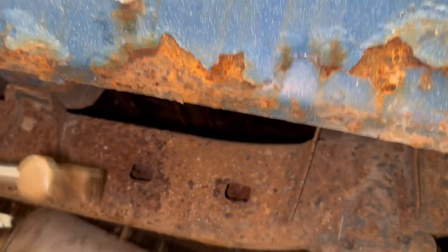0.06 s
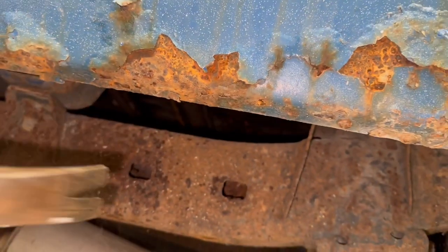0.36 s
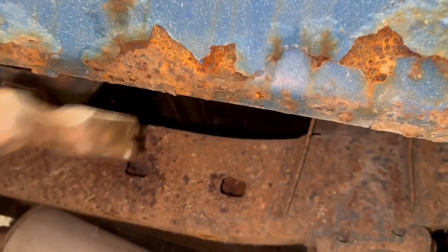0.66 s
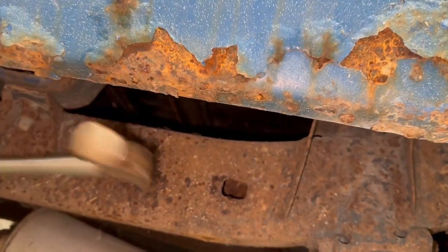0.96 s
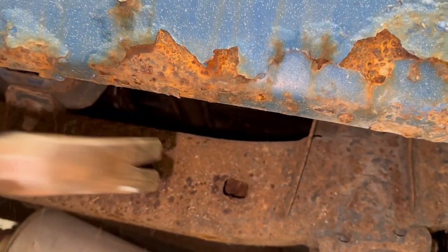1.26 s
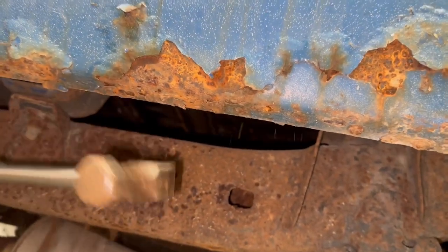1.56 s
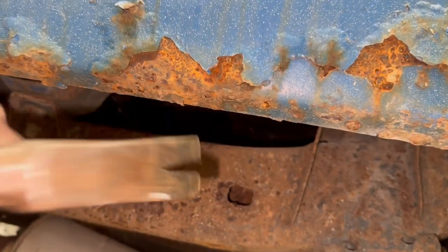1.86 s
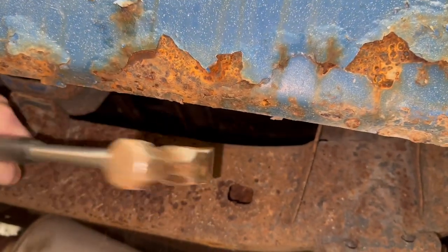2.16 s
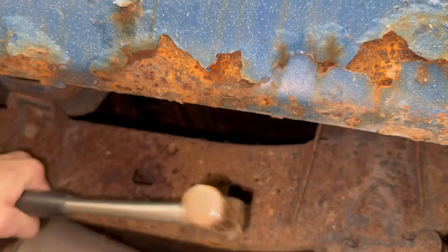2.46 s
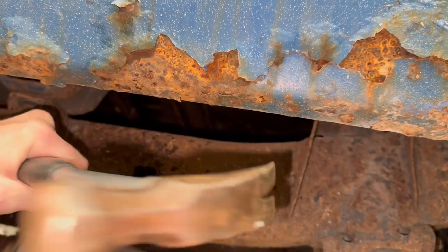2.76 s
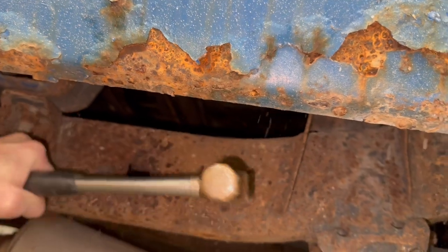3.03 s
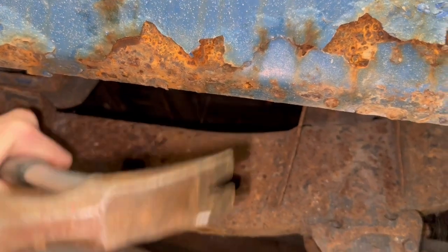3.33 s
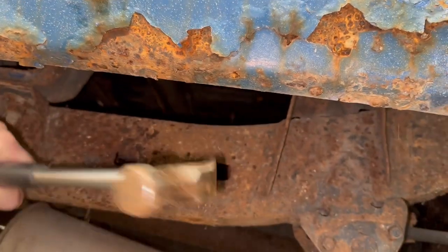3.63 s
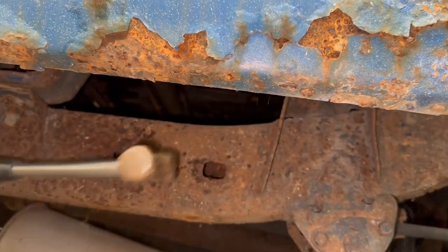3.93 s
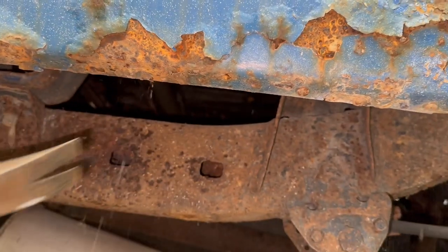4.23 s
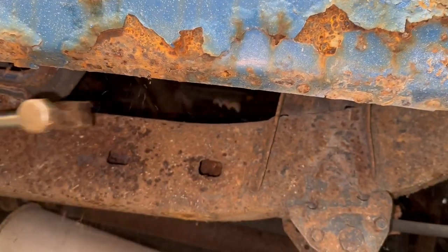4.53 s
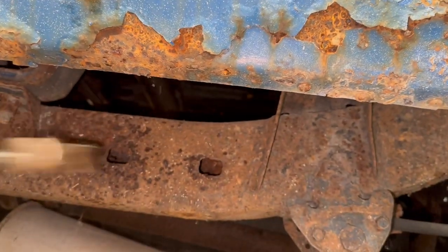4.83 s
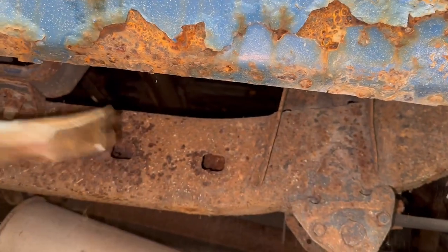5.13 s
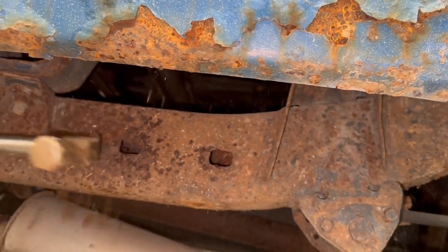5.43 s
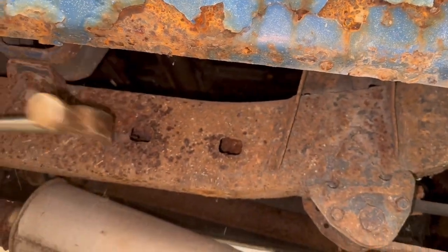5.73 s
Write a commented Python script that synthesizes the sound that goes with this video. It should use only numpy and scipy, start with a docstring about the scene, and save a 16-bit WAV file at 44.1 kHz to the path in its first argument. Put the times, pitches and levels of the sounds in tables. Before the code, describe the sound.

Close, steady hammer blows clank on a corroded steel chassis outdoors, with a short hollow boom and faint trickles of rust.

```python
"""Outdoors, close to the microphone, a claw hammer strikes a vehicle's rusty steel frame rail twice a second.
We come in just after a blow, over faint air. Each blow cracks on the rust, clanks the wall of the rail
and sets the chassis booming and a panel humming; a moment later the loosened rust lands.
The hammer works along the rail and back, catches the folded edge at 4.4 s, and bounces after each of
the last three blows. Throughout, the recorder's limiter holds the peaks."""
import sys
import numpy as np
from scipy import signal
from scipy.fft import rfft, irfft
from scipy.io import wavfile
from scipy.ndimage import uniform_filter1d, minimum_filter1d

SR = 44100
rng = np.random.default_rng(int(sys.argv[2]) if len(sys.argv) > 2 else 0)


def generate_wav(signal):
    """Clip the signal to [-1, 1] and save it as 16-bit WAV at the path in sys.argv[1]."""
    frames = np.transpose(np.atleast_2d(signal))
    scaled = np.clip(frames, -1, 1) * 32767
    pcm = np.round(scaled).astype(np.int16)
    wavfile.write(sys.argv[1], SR, pcm)


N = 259749
RING_T = np.arange(SR) / SR  # the one second in which a struck sound is built
RING_HZ = np.fft.rfftfreq(SR, 1 / SR)


def amp(db):
    """Decibels to gain."""
    return 10 ** (np.asarray(db) / 20)


def unit(x):
    """Scales to an rms of 1."""
    return x / np.sqrt(np.mean(x ** 2) + 1e-20)


def curve(points, hz):
    """Joins (frequency, value) points on a log-frequency axis."""
    f, value = np.transpose(points)
    return np.interp(np.log(hz + 1), np.log(f + 1), value)


def colour(x, spectrum):
    """Filters by (frequency [Hz], gain [dB]) points."""
    return irfft(rfft(x) * amp(curve(spectrum, np.fft.rfftfreq(len(x), 1 / SR))), len(x))


def noise(spectrum, size):
    """Coloured noise of rms 1."""
    return unit(colour(rng.standard_normal(size), spectrum))


def add(mix, s, sound):
    """Mixes in a sound that starts at time s, possibly before zero."""
    start = round(s * SR)
    sound = sound[max(-start, 0):]
    part = mix[max(start, 0):][:len(sound)]
    part += sound[:len(part)]


# Open air around the microphone: (frequency [Hz], relative level [dB])
AIR_SPECTRUM = [(20, -19), (55, -36), (120, 6), (300, 2.5), (1000, 0), (3000, -15.5), (8000, -25),
                (16000, -26)]
def air(level_db=-52):
    """Faint, steady outdoor noise, mostly low."""
    return amp(level_db) * noise(AIR_SPECTRUM, N)


# Level of the ring lingering after each blow, loudest at the start: (time [s], level [dB])
LINGER_LEVEL = [(0, 16), (0.5, 8), (2, 4), (4.85, -2), (5.3, -13)]
def panel(hz=116, width_hz=4, level_db=-39, t60=2.7, linger_share=0.66, swell_s=0.18):
    """A loose body panel takes up every blow and hums on through the gaps as close partials that beat."""
    t = np.arange(N) / SR
    partials = sum(np.cos(2 * np.pi * ((hz + k * width_hz) * t + rng.random())) / (1 + 2 * k ** 2)
                   for k in (-1, 0, 1))
    power = np.zeros(N)
    for s, db, *_ in HAMMER_BLOWS:
        hum_db = db + linger_share * np.interp(s, *np.transpose(LINGER_LEVEL))
        add(power, s, (amp(hum_db - 60 * t / t60) * np.minimum(t / swell_s, 1)) ** 2)
    return amp(level_db) * unit(partials) * np.sqrt(power)


def grains(per_s, spread_db):
    """A second of random ticks of very unequal size."""
    sizes = amp(spread_db * np.minimum(rng.exponential(1, SR), 4)) * rng.choice([-1, 1], SR)
    return sizes * (rng.random(SR) < per_s / SR)


def uneven(x, spread_db=5, count=26):
    """Chance peaks and dips in the treble: no two bits of rust are the same size."""
    pitches = np.geomspace(1500, 16000, count)
    return colour(x, np.c_[pitches, spread_db * rng.uniform(-1, 1, count)])


def flake(length_s, first_tick_db=15):
    """One flake lands with a tick, then its crumbs thin out."""
    ticks = unit(grains(per_s=350, spread_db=6)) * np.exp(-(RING_T / length_s) ** 2)
    ticks[0] = amp(first_tick_db)
    return uneven(ticks)[:SR // 2]


# Large flakes landing on their own: (time [s], level [dB], length [s])
LARGE_FLAKES = [(0.169, -42, 0.023), (0.7, -40, 0.017), (1.362, -52.5, 0.044), (1.746, -36.5, 0.015),
                (3.038, -36, 0.0097), (3.2324, -33, 0.0068), (3.735, -46.5, 0.025), (4.078, -35.5, 0.01),
                (4.645, -44.5, 0.0034)]
# Tone of rust landing under the vehicle: (frequency [Hz], gain [dB])
FLAKE_TONE = [(1000, -7), (3000, -10), (5500, -3.5), (8000, -6), (11000, 3), (14000, -4), (16000, -4)]
def falling_rust(fall_s=0.3, fall_spread=0.4, shower_db=-1, size_db=3, straggler_db=-14,
                 scatter_db=-7, scatter_t60=0.12, count=7):
    """Each blow sheds small flakes, a few large ones fall too; the underbody scatters their sound."""
    out = np.zeros(N)
    for s, *_, rust_db in HAMMER_BLOWS:
        lateness = 2 * (np.arange(count) + rng.random(count)) / count - 1
        for late, size in zip(lateness, rng.uniform(-1.1, 1, count)):
            db = rust_db + shower_db + size_db * size + straggler_db * late ** 2  # faint first and last
            add(out, s + fall_s * np.exp(fall_spread * late), amp(db) * flake(length_s=0.06))
    for s, db, length_s in LARGE_FLAKES:
        add(out, s, amp(db) * flake(length_s))
    out = colour(out, FLAKE_TONE)
    scatter = rng.standard_normal(SR) * amp(-60 * RING_T / scatter_t60)
    return out + amp(scatter_db) * signal.fftconvolve(out, scatter / np.linalg.norm(scatter))[:N]


def mode_crowd(spectrum, t60s, rise_cycles, count=12):
    """Countless weak modes as noise dying band by band, the bass swelling last: two shapes, as spectra."""
    shapes = np.array([rfft(noise(spectrum, SR)) for _ in range(2)])
    centres = np.geomspace(50, 15000, count)
    out = 0
    for hz, weights in zip(centres, np.eye(count)):
        band = irfft(shapes * curve(np.c_[centres, weights], RING_HZ))
        out = out + band * amp(-60 * RING_T / curve(t60s, hz)) * (1 - np.exp(-RING_T * hz / rise_cycles))
    return rfft(out)


def struck_at(shapes, place_m, wavelength_at_1khz_m=0.62):
    """The mix of two shapes turns along the rail, faster for the short bending waves of the treble."""
    turn = 2 * np.pi * place_m / wavelength_at_1khz_m * np.sqrt(RING_HZ / 1000)
    return irfft(shapes[0] * np.cos(turn) + shapes[1] * np.sin(turn))


# The lingering ring: (frequency [Hz], relative level [dB]) and (frequency [Hz], t60 [s])
LINGER_SPECTRUM = [(25, -68), (40, -20.5), (56, -19), (85, -10), (125, -2), (280, -2), (350, -7.5),
                   (560, -6), (900, -8.5), (1400, -16.5), (2000, -26), (4300, -38.5), (5900, -40),
                   (16000, -49)]
LINGER_DECAY = [(70, 1.63), (200, 1.04), (600, 1.1), (1500, 1.03), (5000, 0.78), (12000, 0.38)]
def lingering_ring(level_db=-22):
    """Weak, slowly dying modes ring on after a blow: two shapes, as spectra."""
    return amp(level_db) * mode_crowd(LINGER_SPECTRUM, LINGER_DECAY, rise_cycles=0.14)


# Chassis: (frequency [Hz], relative level [dB]) and (frequency [Hz], t60 [s])
BOOM_SPECTRUM = [(40, -23.5), (110, 9.5), (250, -2.5), (550, 3.5), (720, -6), (1300, -9), (1900, -13.5),
                 (3000, -17), (4500, -26.5), (5900, -25.5), (7500, -36.5), (11000, -27), (16000, -90)]
BOOM_DECAY = [(100, 0.79), (500, 0.57), (1300, 0.2), (4000, 0.13), (14000, 0.12)]
def chassis_boom(level_db=-16):
    """The chassis's weaker modes boom together and die quickly: two shapes, as spectra."""
    return amp(level_db) * mode_crowd(BOOM_SPECTRUM, BOOM_DECAY, rise_cycles=2.13)


# Tone of the echo along the rail: (frequency [Hz], gain [dB])
ECHO_TONE = [(100, -24), (250, -4), (600, 9), (1000, -24), (2500, -14)]
def rail_echo(boom, place_m, level_db=-13):
    """Low waves return from the far end of the rail."""
    return amp(level_db) * colour(struck_at(boom, -place_m), ECHO_TONE)


# Modes of the frame, and of the rail wall under the hammer: (frequency [Hz], level [dB], t60 [s])
FRAME_MODES = [(88, -32, 0.35), (116, -40, 0.67), (130.2, -20.5, 0.36), (167.9, -9.5, 0.11),
               (198.5, -26.5, 0.79), (221.3, -26.5, 0.77), (231.3, -55, 0.99), (272.3, -23.5, 0.73),
               (297.6, -19, 0.42), (386, -10.5, 0.077), (405.1, -21.5, 0.81), (434, -6, 0.065),
               (455.3, -29.5, 0.65), (478.7, -16.5, 0.19), (495.2, -12, 0.092), (604.6, -17.5, 0.26),
               (701, -71, 0.2), (700, -31, 0.23), (840, -27, 0.22), (876, -22.5, 0.28), (890, -37, 1.18),
               (1013, -13.5, 0.042), (1096, -27, 0.31), (1166, -25, 0.15), (1280, -94, 0.12),
               (1183, -32, 0.18), (1432, -31, 0.26), (1370, -64, 0.13)]
WALL_MODES = [(886, -14.5, 0.023), (1250, -1, 0.016), (1564, -11.5, 0.014), (2003, -16, 0.018),
              (2535, -21.5, 0.025), (5480, -38, .02), (6130, -29.5, 0.016), (11000, -50, 0.0067)]
def steel_ring(modes, rise_cycles):
    """One dying sine a row; neighbours start opposed, so the sound builds as waves cross the steel."""
    rows = []
    for k, (hz, db, t60) in enumerate(modes):
        envelope = amp(db - 60 * RING_T / t60) * (1 - np.exp(-RING_T * hz / rise_cycles))
        rows.append((-1) ** k * envelope * np.sin(2 * np.pi * hz * RING_T))
    return np.array(rows)


# Bright ring of the steel: (frequency [Hz], width [Hz], level [dB], t60 [s])
PING_CLUSTERS = [(1370, 190, -38.5, 0.54), (1780, 120, -50, 0.67), (1870, 140, -51, 0.52),
                 (2460, 120, -52, 0.52), (3530, 220, -47.5, 0.21), (4350, 150, -66, 0.69),
                 (5600, 350, -55.5, 0.77), (6170, 180, -54, 0.4)]
def steel_ping(rise_s=0.0005):
    """Clusters of close partials beat as they die: two shapes, as spectra."""
    shapes = rfft(rng.standard_normal((2, SR)))
    out = 0
    for hz, width_hz, db, t60 in PING_CLUSTERS:
        cluster = unit(irfft(shapes * np.exp(-((RING_HZ - hz) / width_hz) ** 2)))
        out = out + cluster * amp(db - 60 * RING_T / t60)
    return rfft(out * (1 - np.exp(-RING_T / rise_s)))


# Rust crushed under the face, heard close up: (frequency [Hz], relative level [dB])
CRACK_SPECTRUM = [(300, -16), (1200, 9), (2400, -3.5), (3400, -2.5), (4700, -4.5), (6100, 0.5),
                  (7800, -8.5), (13000, -6.5), (16000, -15)]
def rust_crack(level_db=-17, hold_s=0.0027, rise_s=0.0013, spray_db=-22, spray_t60=0.11):
    """A few milliseconds of grit as the face crushes the rust, then a thin spray of chips."""
    grit = unit(colour(grains(per_s=14000, spread_db=5.5), CRACK_SPECTRUM))
    chips = unit(colour(grains(per_s=4000, spread_db=3), CRACK_SPECTRUM))
    crush = grit * (1 - np.exp(-RING_T / rise_s)) / (1 + (RING_T / hold_s) ** 2)
    spray = chips * amp(spray_db - 60 * RING_T / spray_t60)
    return amp(level_db) * (uneven(crush) + spray)


# Bounces of the hammer head: (time [s], thud [dB], click [dB])
HEAD_BOUNCES = [(4.9398, -13.5, -1.5), (5.3958, -20.5, -16.5), (5.7844, -16, -10)]
def bounces(ping_db=-12, linger_db=0):
    """The head drops back on the rail where the last blow landed."""
    for s, thud_db, click_db in HEAD_BOUNCES:
        place_m = [blow[2] for blow in HAMMER_BLOWS if blow[0] < s][-1]
        yield s, place_m, [(1200, thud_db), (2200, click_db)], click_db + ping_db, linger_db


# Blows close to the microphone:
# (time [s], strength [dB], place along the rail [m], on the edge [0-1], ping [dB], loosened rust [dB])
HAMMER_BLOWS = [(-.06, -2.5, .03, 0.04, 3, -48), (0.4595, 0, 0.047, 0.12, 0.5, -50.5),
                (0.9652, 0.5, 0.036, 0.14, -1.5, -57.5), (1.4523, 0, 0.11, 0.06, 0, -48.5),
                (1.9647, -1, 0.12, 0, 5, -55.5), (2.4608, -0.5, 0.14, 0.06, 1.5, -55.5),
                (2.955, 0, 0.19, 0.17, -10, -69), (3.4377, -1, 0.15, 0.02, 0, -55.5),
                (3.884, 0, 0.16, 0.07, 1, -71), (4.4020, 0, 0.053, 1, 9, -71),
                (4.8569, 1, 0.082, 0.18, 2.5, -65), (5.2968, 0, 0.0032, 0.03, 3.5, -71),
                (5.7030, -0.5, 0.013, 0.08, 5, -53.5)]
# A blow on the folded edge loses its low knock and clanks brighter: (frequency [Hz], gain [dB])
EDGE_TONE = [(230, -2.5), (420, -13.5), (680, -16), (1080, 3), (1500, 10.5), (2300, 2.5), (5500, 1)]
def blows(mid_span_m=0.24):
    """The wall clanks most at mid-span; towards the stiff end the knock takes over."""
    for s, db, place_m, edge, ping_db, _ in HAMMER_BLOWS:
        stiffness = (1 - place_m / mid_span_m) ** 2
        boom_db = 1
        knock_db = -1 + 0.5 * stiffness
        clank_db = 3.5 - 12.5 * stiffness
        snap_db = -1 + 0.5 * stiffness + 0.05 * ping_db
        crack_db = 2.94 + 0.27 * ping_db  # a harder contact pings more and cracks more
        hz, tone_db = np.transpose([(230, boom_db), (420, knock_db), (680, knock_db), (1080, clank_db),
                                    (1500, clank_db), (2300, snap_db), (5500, crack_db)])
        force = np.c_[hz, db + tone_db + edge * curve(EDGE_TONE, hz)]
        yield s, place_m, force, db + ping_db, np.interp(s, *np.transpose(LINGER_LEVEL))


def hammer(shape_db=3, linger_after_s=0.38, echo_s=0.037):
    """Every contact rings the same frame; where and how it lands sets the share of boom, clank and crack."""
    frame = steel_ring(FRAME_MODES, rise_cycles=2.58)
    clank = steel_ring(WALL_MODES, rise_cycles=0.85).sum(0)
    ping, boom, linger = steel_ping(), chassis_boom(), lingering_ring()
    late = np.minimum(RING_T / linger_after_s, 1)
    order = np.arange(len(FRAME_MODES))
    out = np.zeros(N)
    for s, place_m, force, ping_db, linger_db in [*blows(), *bounces()]:
        mode_gains = amp(shape_db * np.sin(np.pi * order * place_m))  # higher modes have more nodes
        chassis = struck_at(boom, place_m)
        add(chassis, echo_s, rail_echo(boom, place_m))
        tail = amp(linger_db * late) * struck_at(linger, place_m)
        steel = mode_gains @ frame + clank + chassis + tail + rust_crack()
        strike = colour(steel, force) + amp(ping_db) * struck_at(ping, place_m)
        add(out, s, strike[:SR * 4 // 5])
    return out


def scene():
    """Hammer, humming panel and rust over faint outdoor air, at one close microphone."""
    return (hammer() + panel() + falling_rust() + air())[None]


def record(dry, ceiling_db=-2.0, recovery_db_per_s=300, quiet_db=-35, expansion=0.31, memory_s=0.0045,
           cutoff_hz=16100):
    """A look-ahead limiter holds the peaks, a noise suppressor lowers the gaps; then the band limit."""
    over_db = np.maximum(20 * np.log10(abs(dry[0]) + 1e-9) - ceiling_db, 0)
    recovery_db = np.arange(N) * recovery_db_per_s / SR
    held_db = np.maximum.accumulate(over_db + recovery_db) - recovery_db
    limiter_db = uniform_filter1d(minimum_filter1d(-held_db, size=25), size=25)
    power = signal.lfilter([1], [1, -np.exp(-1 / (memory_s * SR))], dry[0] ** 2) / (memory_s * SR)
    suppressor_db = expansion * np.clip(10 * np.log10(power + 1e-12) - quiet_db, -10, 0)
    lowpass = signal.firwin(255, cutoff_hz, window=("kaiser", 9), fs=SR)
    return signal.oaconvolve(dry * amp(limiter_db + suppressor_db), lowpass[None], "same")


dry = scene()
out = record(dry)
generate_wav(out)
```